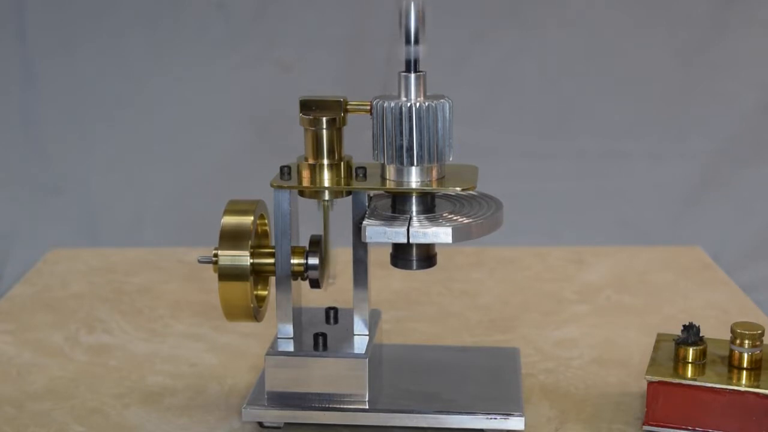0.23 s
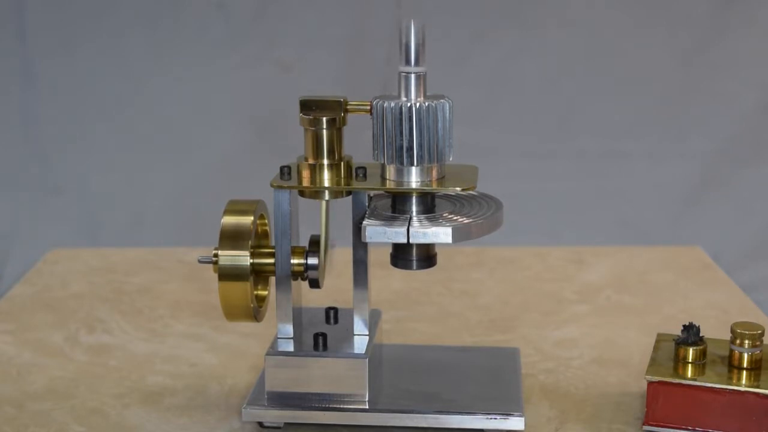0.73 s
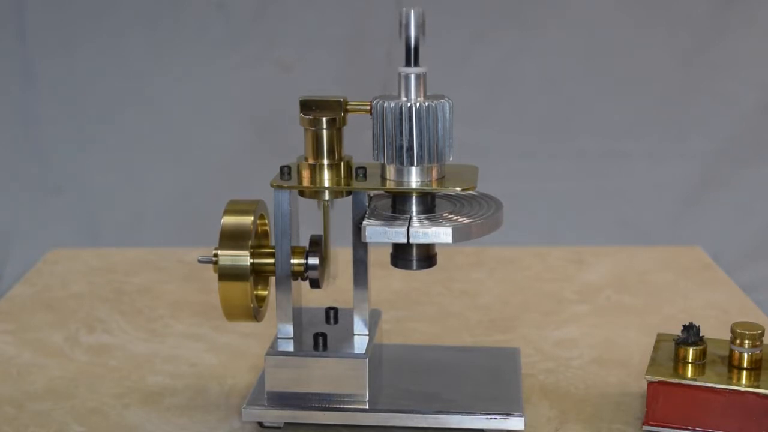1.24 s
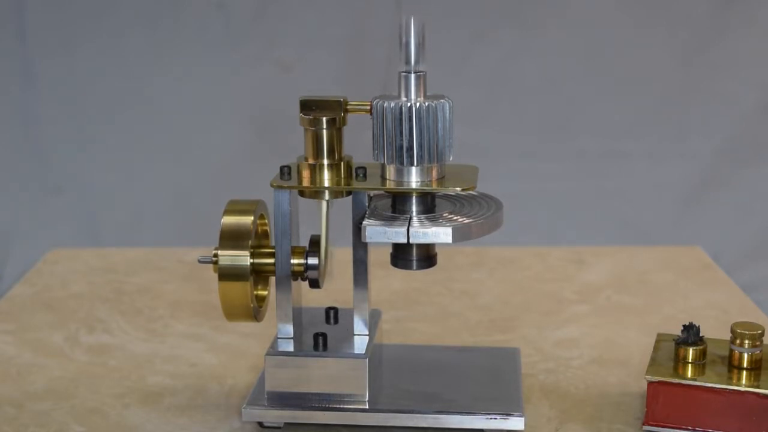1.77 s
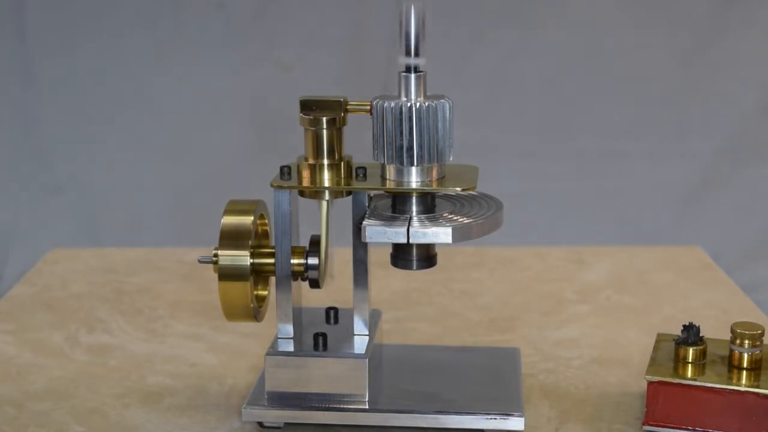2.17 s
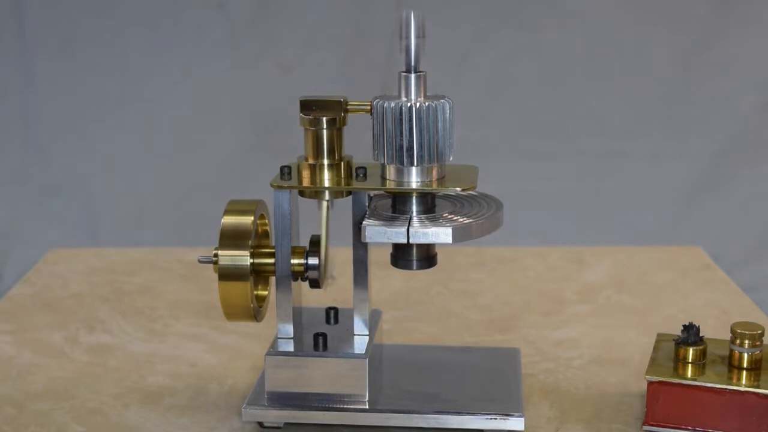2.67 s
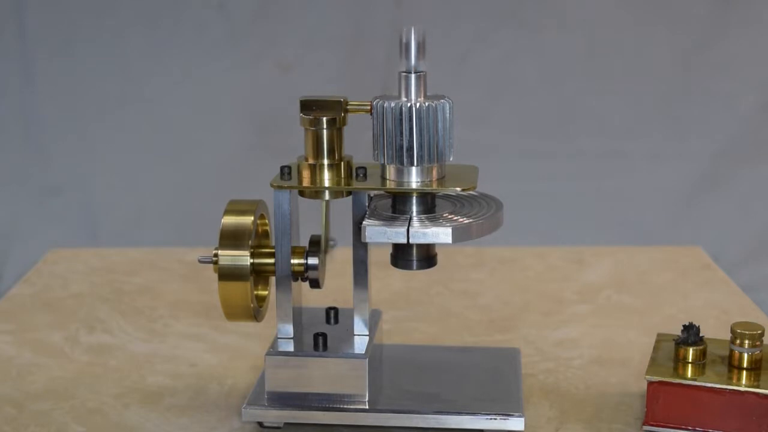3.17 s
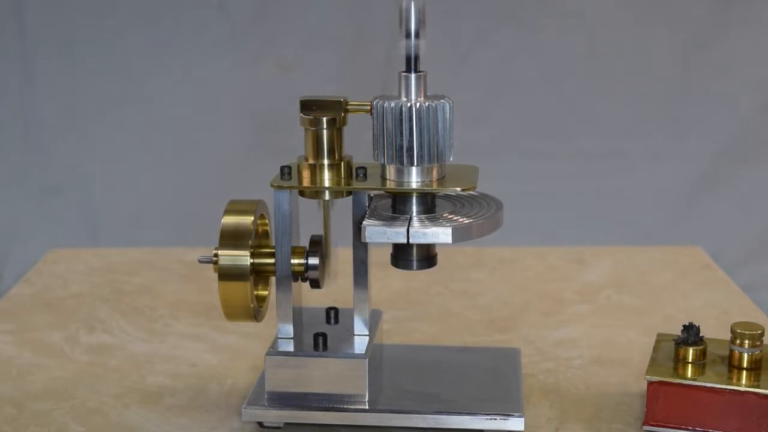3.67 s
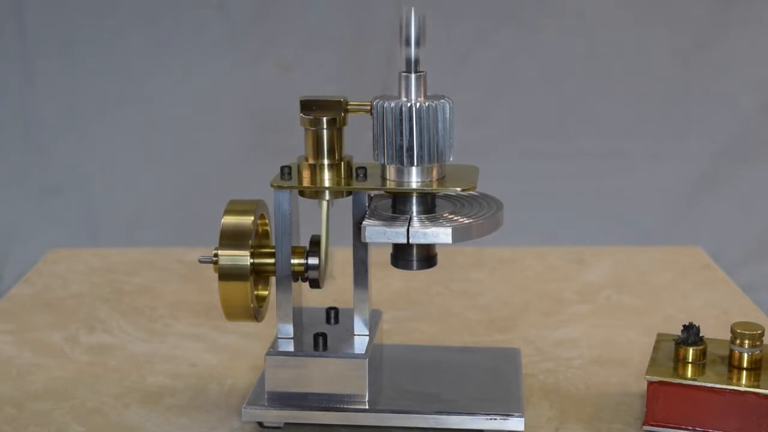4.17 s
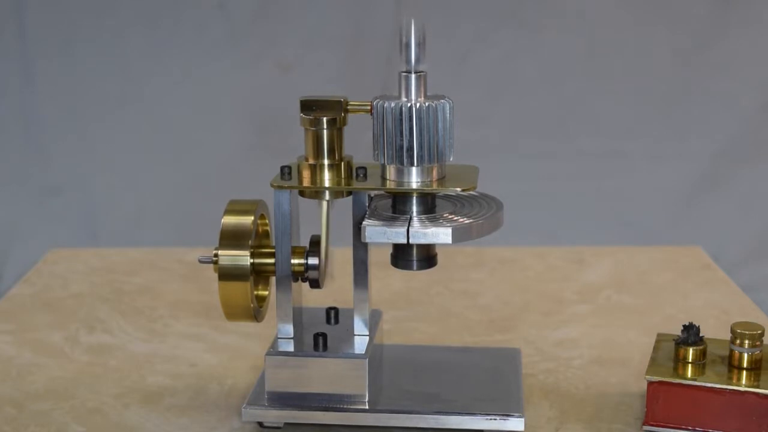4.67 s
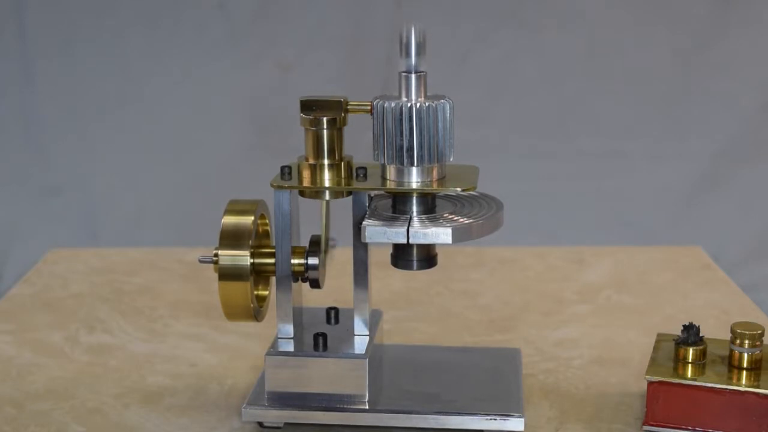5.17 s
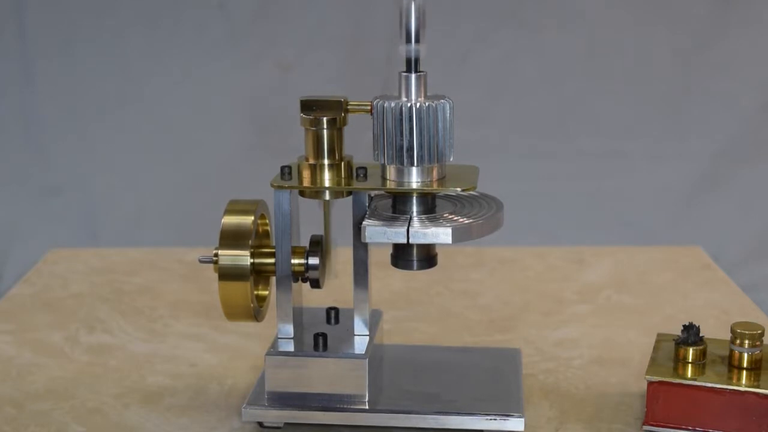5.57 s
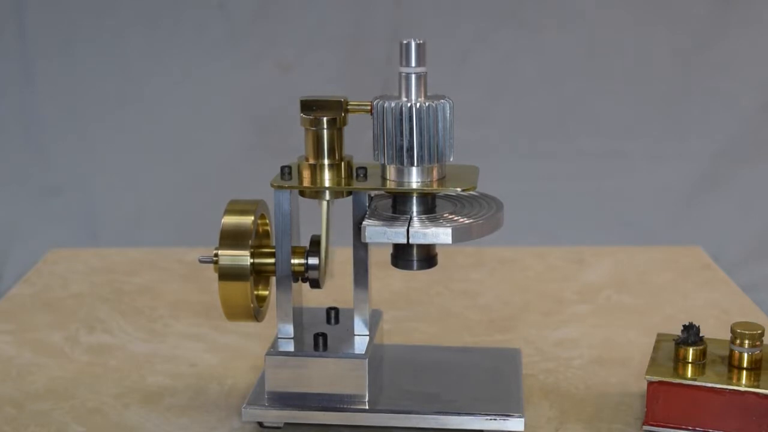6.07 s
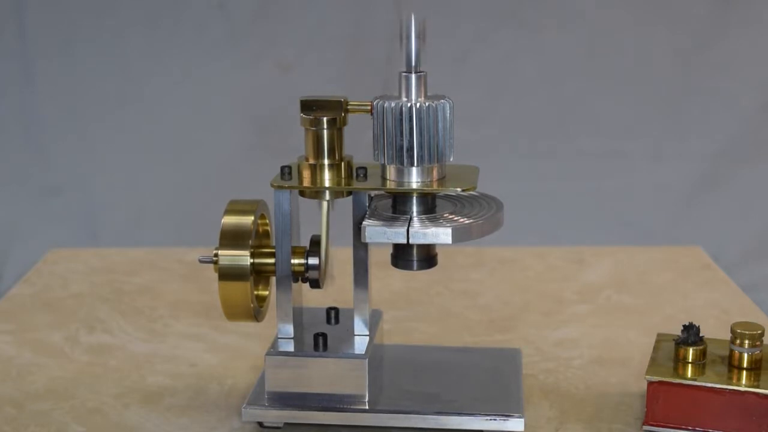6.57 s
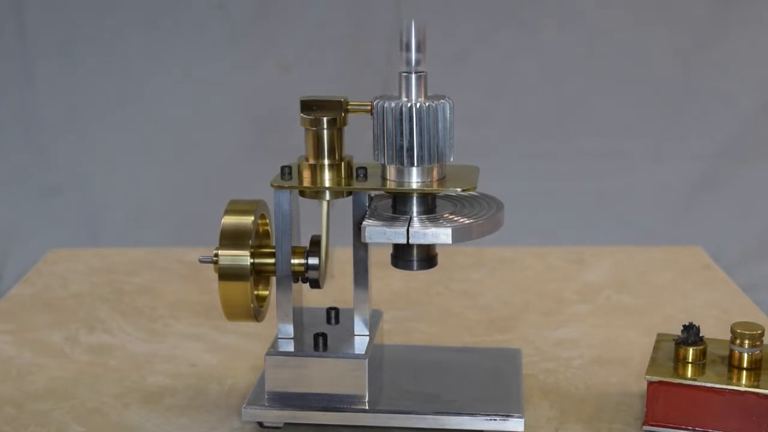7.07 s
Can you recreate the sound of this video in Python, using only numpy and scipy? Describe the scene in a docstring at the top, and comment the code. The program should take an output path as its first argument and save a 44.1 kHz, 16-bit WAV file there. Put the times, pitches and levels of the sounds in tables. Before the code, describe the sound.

Rapid, ringing metal taps and duller knocks from a miniature tabletop engine merge into a clatter with a few brief falters.

```python
"""A miniature hot-air engine runs on a table in a small room, close up, at about 20 turns a second.
From the start its loose piston strikes both ends of the stroke, a bright tap up and a duller knock down,
ringing frame, fins and cylinder over faint linkage ticks, room noise and mains hum. Now and then the
stroke falls short and the rattle stumbles, longest near 1.3 s and 4.2 s. From 5 s a faint drone rises,
fading by 6.6 s; the rattle stumbles once more near 6.2 s, then runs steadily to the end."""
import sys
import numpy as np
from scipy import signal
from scipy.fft import rfft, irfft, next_fast_len
from scipy.io import wavfile
from scipy.ndimage import uniform_filter1d

SR = 44100
rng = np.random.default_rng(int(sys.argv[2]) if len(sys.argv) > 2 else 0)


def wav_out(sig):
    """Save sig, one row per channel (or a flat mono array), as 16-bit PCM at SR to the path in sys.argv[1]."""
    wavfile.write(sys.argv[1], SR, np.round(np.clip(np.atleast_2d(sig).T, -1, 1) * 32767).astype(np.int16))


N = 322371
RING_SAMPLES = 2 ** 14
RING_HZ = np.fft.rfftfreq(RING_SAMPLES, 1 / SR) + 1  # offset keeps the log finite


def amp(db):
    """Decibels to gain."""
    return 10 ** (np.asarray(db) / 20)


def unit_rms(x):
    """Scale to rms 1."""
    return x / np.sqrt(np.mean(x ** 2) + 1e-20)


def bin_gains(points, size):
    """(frequency [Hz], gain [dB]) points to linear gain per FFT bin."""
    hz, db = np.transpose(points)
    bin_hz = np.fft.rfftfreq(size, 1 / SR) + 1
    return amp(np.interp(np.log(bin_hz), np.log(hz), db))


def coloured(x, points):
    """Filter x by a gain curve; rms 1."""
    size = next_fast_len(N)
    return unit_rms(irfft(rfft(x, size) * bin_gains(points, size), size)[:N])


def minimum_phase(gain):
    """Spectrum of the most abrupt causal response with this gain."""
    cepstrum = irfft(np.log(gain))
    cepstrum[1:RING_SAMPLES // 2] *= 2
    cepstrum[RING_SAMPLES // 2 + 1:] = 0
    return np.exp(rfft(cepstrum))


def noise_tails(t60_s, rise_s, count=1):
    """Spectra of decaying noise bursts, mean energy 1."""
    t = np.arange(RING_SAMPLES) / SR
    envelope = np.exp(-np.log(1000) * t / t60_s) * (1 - np.exp(-t / rise_s))
    return rfft(rng.standard_normal((count, RING_SAMPLES)) * envelope / np.linalg.norm(envelope))


# Spells of steady rattling: (start [s], length [turns], first speed [turns/s], last speed [turns/s],
# full-stroke level [dB], start shortfall [dB], end shortfall [dB])
RATTLE_SPELLS = [(0.0036, 10, 20.72, 21.42, -16.1, 0, 4.8), (0.5726, 12, 20.43, 21.69, -16.3, 3.9, 9.2),
                 (1.5401, 5, 19.43, 19.01, -15.3, 3.1, 4.4), (1.7994, 9, 19.81, 20.04, -15.9, 3.9, 1.9),
                 (2.4028, 18, 19.73, 20.83, -15.4, 3.3, 4.5), (3.3892, 14, 20.70, 20.97, -15.7, 1, 3.1),
                 (4.4028, 2, 20.7, 20.7, -15.2, 0, 0), (4.5061, 15, 20.11, 20.51, -16.1, .8, 1.6),
                 (5.2461, 16, 20.73, 21.02, -16.1, .5, 1.2), (6.4026, 19, 19.65, 20.4, -15.6, 1.4, 0)]


def strokes(phase_turns, gain_db, build_turns=.55, fade_turns=1.26, uneven_db=.45, late_s_per_db=.0012):
    """One (time [s], level [dB]) blow a turn; each spell builds, holds and falls short."""
    blows = []
    for start_s, turns, first_speed, last_speed, full_db, build_db, fade_db in RATTLE_SPELLS:
        turn = np.arange(round(turns)) + phase_turns
        period_change_s = 1 / last_speed - 1 / first_speed
        crank_s = start_s + turn / first_speed + period_change_s * turn ** 2 / (2 * len(turn))
        turns_left = len(turn) - .5 - turn
        short_db = build_db * np.exp(-turn / build_turns) + fade_db * np.exp(-turns_left / fade_turns)
        short_db += uneven_db * rng.standard_normal(len(turn))
        # a short stroke lands later and softer
        blows += zip(crank_s + late_s_per_db * short_db, full_db + gain_db - short_db)
    return blows


# Modes, table top (low) through frame to fins and cylinder (high):
# (frequency [Hz], width [Hz], level struck up [dB], level struck down [dB])
ENGINE_MODES = [(150, 20, 31, 25), (312, 40, 22, 32), (400, 28, 35, 31), (510, 90, 29, 21),
                (690, 50, 33, 38), (885, 30, 32, 35), (1119, 28, 34, 38), (1232, 32, 41, 42),
                (1264, 20, 44, 42), (1746, 180, 25, 29), (2040, 100, 25, 36), (2328, 70, 30, 33),
                (3702, 34, 38, 28), (3849, 20, 38, 31), (3958, 22, 41, 38), (4075, 17, 37, 37),
                (4161, 18, 39, 41), (4245, 16, 40, 43), (4289, 11, 34, 39), (5743, 18, 46, 44.5),
                (5860, 170, 35, 31), (5028, 170, 36, 20), (6655, 120, 37, 30), (10748, 255, 11, 21),
                (15062, 387, -6, 14)]


def ringing(contact, upward):
    """Contact spectrum plus one resonance per mode."""
    centre_hz, width_hz, up_db, down_db = np.transpose(ENGINE_MODES)
    detuning = (RING_HZ ** 2 - centre_hz[:, None] ** 2) / (RING_HZ * width_hz[:, None])
    mode_power = amp(up_db if upward else down_db) ** 2 @ (1 / (1 + detuning ** 2))
    return minimum_phase(np.sqrt(bin_gains(contact, RING_SAMPLES) ** 2 + mode_power))


def bending_lag(cycles):
    """Dispersion: bending waves carry treble faster than bass, each frequency `cycles` periods late."""
    return np.exp(-2j * np.pi * cycles * np.log(RING_HZ))


# Echoes inside base and table top: (frequency [Hz], relative gain [dB])
BASE_ECHOES = [(200, 6), (500, 8), (1100, -13), (2000, 2.5), (4500, -2), (15000, -3)]


def frame(wave_db, lag_cycles, thud_db, echo_db, echo_t60_s):
    """Path from contact to air: bending wave, frame rebounds, falling table thud, echoes in the base."""
    wave = amp(wave_db) * bending_lag(lag_cycles) / np.hypot(1, RING_HZ / 4200)
    rebounds = noise_tails(t60_s=.015, rise_s=.0003)[0]
    thud = amp(thud_db) * bending_lag(3.5) / (1 + (RING_HZ / 750) ** 4)
    echoes = amp(echo_db) * bin_gains(BASE_ECHOES, RING_SAMPLES)
    path = wave + rebounds + thud + echoes * noise_tails(echo_t60_s, rise_s=.0016)[0]
    # flatten the broad colour, keep the smear in time
    smooth_power = np.abs(uniform_filter1d(np.abs(path) ** 2, size=14))
    return path * minimum_phase(smooth_power ** -.5)


# Wall reflections: (frequency [Hz], gain re direct sound [dB])
WALL_ECHOES = [(150, -8.5), (600, -10.5), (2000, -7.5), (5000, -11), (14000, -10)]


def impacts(blows, response, chatter_db, treble_db_per_db):
    """Blows on one spot: nearly the same ring each time, with fresh contact chatter and wall echoes."""
    times_s, levels_db = np.transpose(blows)
    # a weaker blow stays in contact longer and loses treble
    treble_band = RING_HZ ** 2 / (RING_HZ ** 2 + 4200 ** 2)
    treble_gain = amp(treble_db_per_db * (levels_db - np.median(levels_db)))
    spectra = response * (1 + (treble_gain[:, None] - 1) * treble_band)
    chatter = amp(chatter_db) * noise_tails(t60_s=.013, rise_s=.0001, count=len(blows))
    walls = bin_gains(WALL_ECHOES, RING_SAMPLES) * noise_tails(t60_s=.32, rise_s=.0017, count=len(blows))
    rings = irfft(spectra * (1 + chatter + walls))
    out = np.zeros(N + 2 * RING_SAMPLES)
    for time_s, level_db, ring in zip(times_s, levels_db, rings):
        start = max(round(time_s * SR), 0)
        out[start:start + RING_SAMPLES] += amp(level_db) * ring
    return out[:N]


# Contact spectra, hard top and dull bottom: (frequency [Hz], level [dB])
TOP_CONTACT = [(60, 4), (220, -64), (400, 33.5), (1000, 21), (1700, 25), (2750, 24.5), (3400, 32.5),
               (4600, 19), (5450, -21), (7500, 25), (9000, 14), (14000, -12)]
BOTTOM_CONTACT = [(60, 1), (220, -5), (400, 21.5), (1000, 20), (1700, 29.5), (2750, 23.5), (3400, 26.5),
                  (4600, 21.5), (5450, -30), (7500, 22), (9000, 12.5), (14000, -4)]
# Stray top taps and bottom knocks during stumbles: (time [s], level [dB])
STRAY_TAPS = [(1.2444, -19), (3.3349, -17.5), (4.1022, -18), (4.2595, -23), (4.3488, -17.5),
              (6.2578, -20.5)]
STRAY_KNOCKS = [(0.5084, -21.5), (1.1594, -20.5), (1.2166, -19), (1.2713, -20.5), (1.4748, -23.5),
                (1.5185, -18), (2.2867, -21), (2.3368, -23), (2.3822, -18.5), (3.3687, -18),
                (4.1411, -21.5), (4.1915, -23.5), (4.2273, -18.5), (4.2865, -20), (4.3808, -16),
                (6.0457, -23), (6.0803, -18), (6.165, -20.5), (6.2328, -20), (6.2852, -19), (6.3763, -17)]


def piston():
    """The loose piston hits both ends of its stroke, pushing the frame in opposite directions."""
    top = ringing(TOP_CONTACT, upward=True)
    top *= frame(wave_db=4, lag_cycles=.8, thud_db=10, echo_db=1.5, echo_t60_s=.07)
    bottom = ringing(BOTTOM_CONTACT, upward=False)
    bottom *= frame(wave_db=0, lag_cycles=.9, thud_db=7.5, echo_db=0, echo_t60_s=.068)
    up_blows = [*strokes(phase_turns=0, gain_db=0), *STRAY_TAPS]
    taps = impacts(up_blows, top, chatter_db=-18, treble_db_per_db=2.7)
    down_blows = strokes(phase_turns=.535, gain_db=-1)
    knocks = impacts(down_blows, bottom, chatter_db=-20, treble_db_per_db=.9)
    stray_knocks = impacts(STRAY_KNOCKS, bottom, chatter_db=-13, treble_db_per_db=.9)
    return knocks + stray_knocks - taps


# Bearing and linkage noise: (frequency [Hz], relative gain [dB])
LINKAGE_SPECTRUM = [(300, -15), (1300, -8), (4200, 0), (6000, -7), (10000, -10), (16000, -29)]


def linkage(tick_db, rub_db, ticks_per_s, tick_t60_s):
    """Crank and bearings rub softly and tick in their play."""
    kicks = (rng.random(N) < ticks_per_s / SR) * amp(2.9 * rng.standard_normal(N))
    decay = np.exp(-np.log(1000) / (tick_t60_s * SR))
    envelope = signal.lfilter([1], [1, -decay], kicks)
    ticks = coloured(envelope * rng.standard_normal(N), LINKAGE_SPECTRUM)
    rub = coloured(rng.standard_normal(N), LINKAGE_SPECTRUM)
    return amp(tick_db) * ticks + amp(rub_db) * rub


# Room noise: (frequency [Hz], relative gain [dB])
ROOM_SPECTRUM = [(20, -36), (40, -34), (65, -3.5), (100, -16), (220, -19.5), (500, -3), (1000, -18),
                 (3000, -35), (16000, -37)]


def room_tone(noise_db, hum_db, hum_hz):
    """Steady room noise and mains hum."""
    noise = coloured(rng.standard_normal(N), ROOM_SPECTRUM)
    hum = unit_rms(np.sin(2 * np.pi * hum_hz * np.arange(N) / SR))
    return amp(noise_db) * noise + amp(hum_db) * hum


# Drone glide: (time [s], frequency [Hz], level [dB])
DRONE_GLIDE = [(5, 101.4, -75), (5.6, 108, -59), (6.25, 126.1, -49), (6.6, 130, -74)]


def drone():
    """A faint low tone climbs in pitch as it swells and fades."""
    t = np.arange(N) / SR
    times_s, hz, levels_db = np.transpose(DRONE_GLIDE)
    phase = 2 * np.pi * np.cumsum(np.interp(t, times_s, hz)) / SR
    return amp(np.interp(t, times_s, levels_db)) * unit_rms(np.sin(phase))


def scene():
    """The engine over the quiet room, mono."""
    engine = piston() + linkage(tick_db=-49, rub_db=-53.5, ticks_per_s=50, tick_t60_s=.014)
    room = room_tone(noise_db=-46.5, hum_db=-56.5, hum_hz=121.6)
    return (engine + room + drone())[None]


def record(dry):
    """Soft peak limit, then a brick-wall low-pass."""
    ceiling, cutoff_hz = .95, 15900
    rounded = dry / (1 + np.abs(dry / ceiling) ** 6) ** (1 / 6)
    size = next_fast_len(N + RING_SAMPLES)
    passband = np.fft.rfftfreq(size, 1 / SR) < cutoff_hz
    return irfft(rfft(rounded, size) * passband, size)[:, :N]


dry = scene()
out = record(dry)
wav_out(out)
```